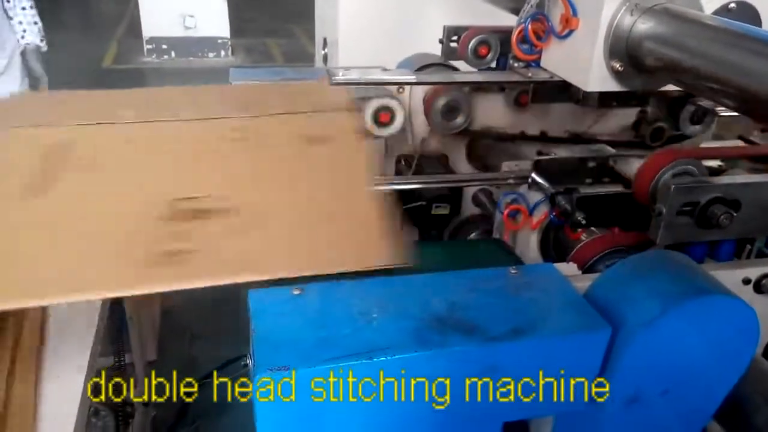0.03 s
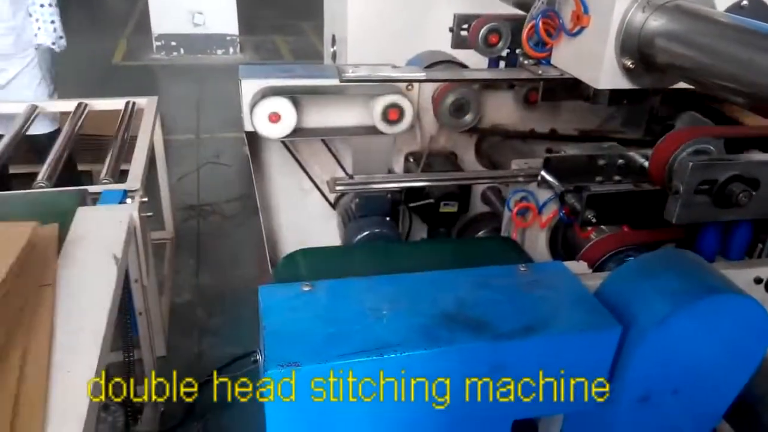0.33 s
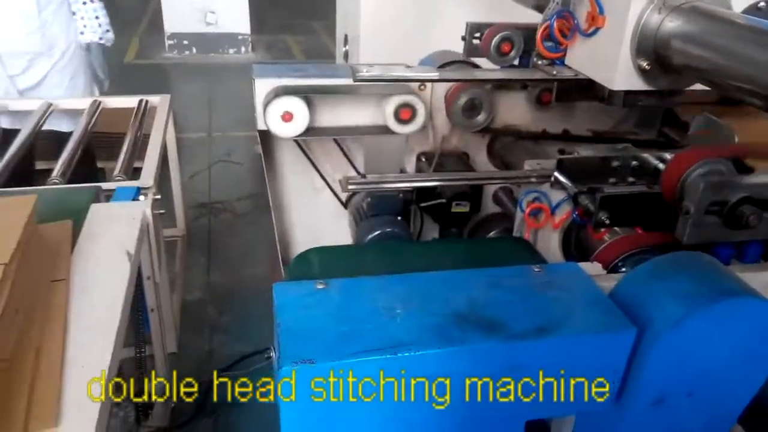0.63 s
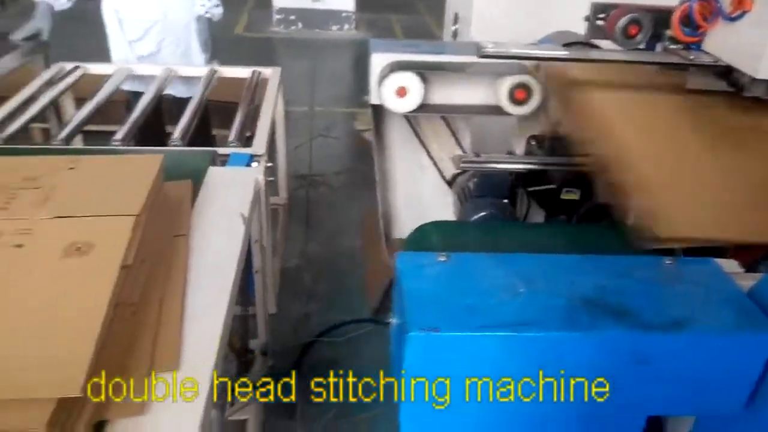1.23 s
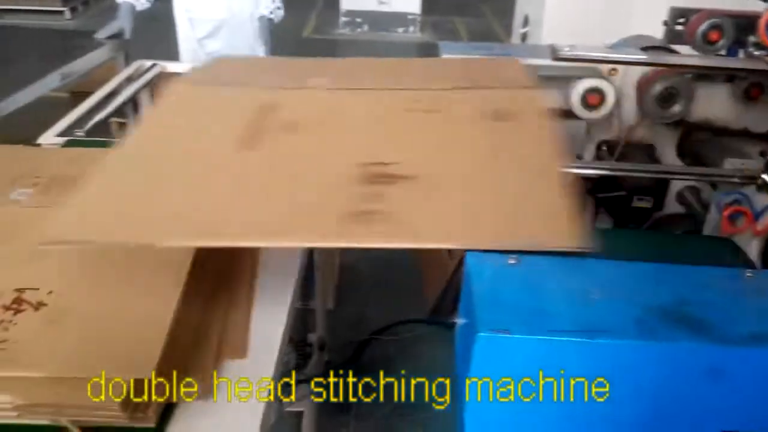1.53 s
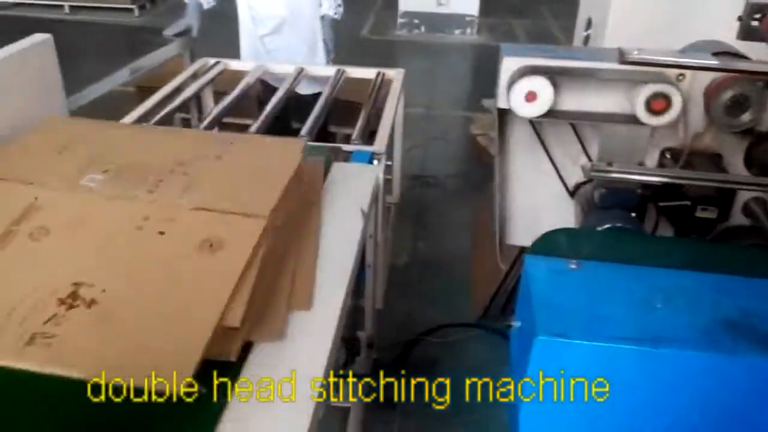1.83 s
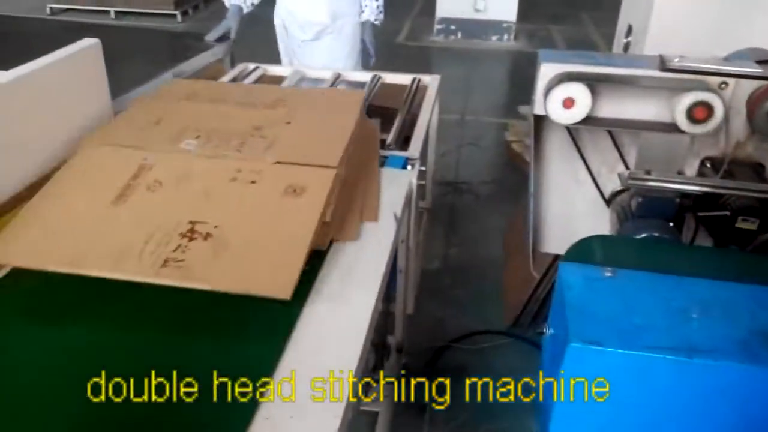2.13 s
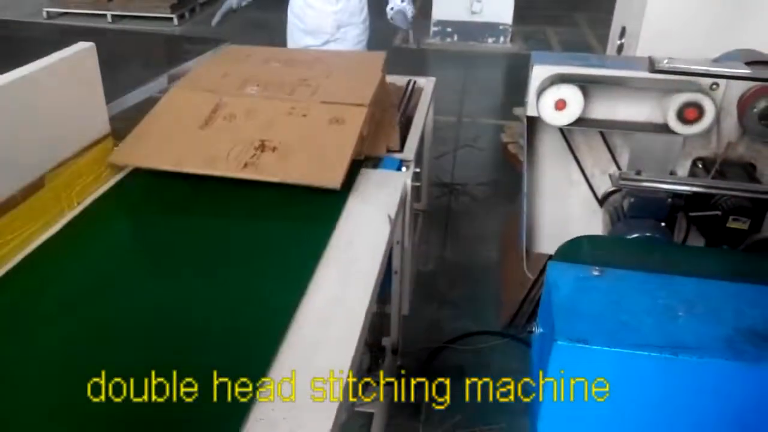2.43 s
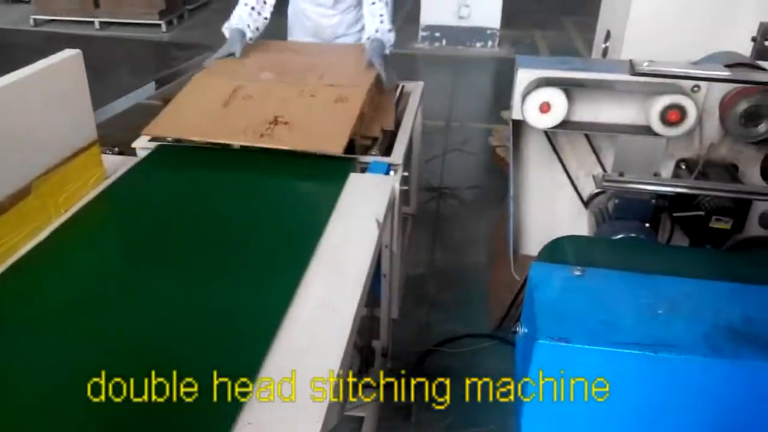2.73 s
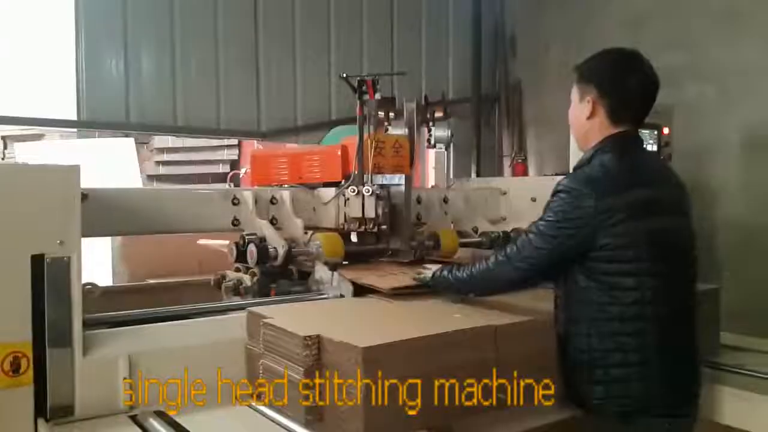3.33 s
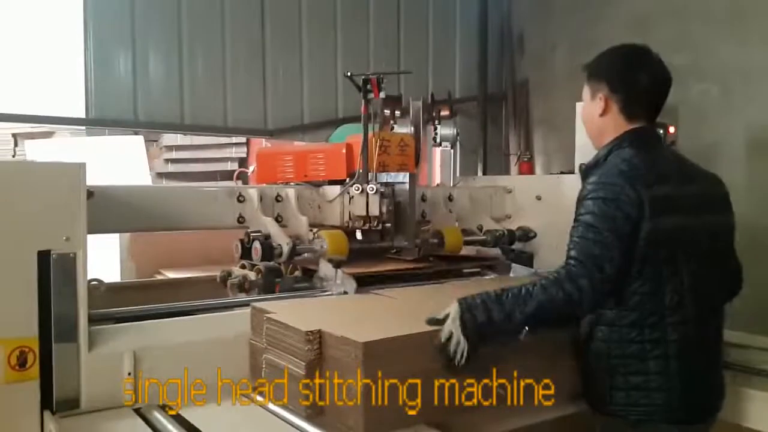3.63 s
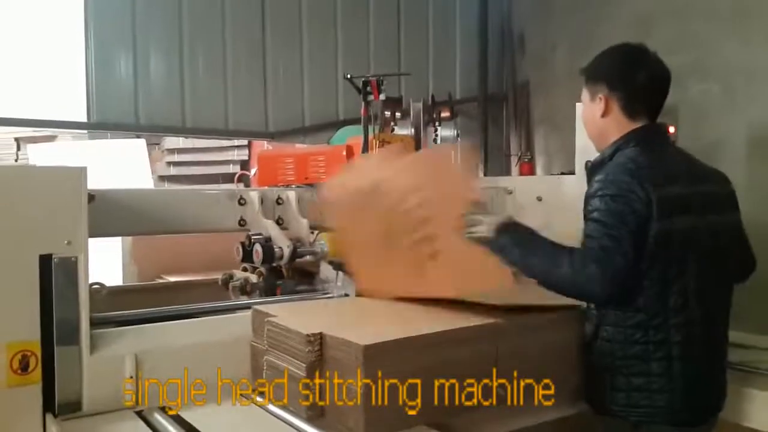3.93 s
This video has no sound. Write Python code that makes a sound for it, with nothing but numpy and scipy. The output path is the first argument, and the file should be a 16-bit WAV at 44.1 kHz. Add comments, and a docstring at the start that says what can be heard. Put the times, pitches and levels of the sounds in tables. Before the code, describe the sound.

A carton stitching machine hammers staples in two rapid bursts, close by in a workshop, amid sharp air hisses, chain rattle and roller rumble. Cardboard slides and bumps. After a brief silence, a second, more distant machine clatters.

```python
"""Two carton stitchers in a workshop.

A double-head stitcher hammers in wire staples by impact, while valves spit jets of air, the drive
rattles and rumbling rollers throw the carton out. After a short silence a single-head stitcher hums,
then starts to clatter. Struck panels and steel parts ring; a limiter ducks the loudest moments."""
import sys
import numpy as np
from scipy import signal
from scipy.fft import rfft, irfft
from scipy.io import wavfile
from scipy.ndimage import uniform_filter1d

SR = 44100
rng = np.random.default_rng(int(sys.argv[2]) if len(sys.argv) > 2 else 0)


def file_out(sig):
    """Save sig as 16-bit WAV at sys.argv[1]."""
    # one column per channel
    cols = np.atleast_2d(sig).T
    # limit, then scale
    lim = np.clip(cols, -1, 1)
    pcm = np.round(lim * 32767).astype(np.int16)
    wavfile.write(sys.argv[1], SR, pcm)


N = 176400
T = np.arange(N) / SR

# blows of the two heads and the carton feed (t/s, level/dB)
HEAD_BLOWS = [(.093, -12.5), (0.16, -29), (0.457, -11.5), (0.566, -14), (0.668, -10), (.714, -7.5),
              (0.759, -7), (0.796, -9), (.859, -14.5), (0.902, -9.5), (0.944, -8), (2.11, -17.5),
              (2.379, -7.5), (2.425, -11), (2.467, -8.5), (2.568, -12), (2.613, -7.5), (2.718, -11.5),
              (2.76, -9.5), (2.818, -12)]
# spectrum of a staple blow (f/Hz, level/dB)
STAPLE_SPECTRUM = [(300, -12), (1200, -9), (3000, 9.5), (6200, 5.5), (8200, -6.5), (15000, -22.5)]
# valve exhausts (t/s, level/dB, hold/s, release T60/s)
EXHAUSTS = [(.004, -13, 0.053, 0.18), (0.153, -13.5, 0.017, .4), (0.303, -14, 0.011, .07),
            (0.373, -6, 0.0053, .04), (0.383, -9, 0.085, 1.1), (1.383, -16.5, 0.18, 0.15),
            (2.099, -21.5, 0.09, .3), (2.18, -6.5, 0.0052, 0.053), (2.198, -7.5, 0.061, 1.1)]
# steady escape of air (t/s, level/dB)
LEAK_LEVEL = [(.35, -19.5), (.7, -16.5), (1.54, -15), (1.62, -20), (1.68, -17.5), (2.05, -25.5), (2.5, -15)]
# spectrum of the air jets (f/Hz, level/dB)
AIR_SPECTRUM = [(500, -40), (1800, -24.5), (3000, -6.5), (4600, -7), (5600, 1.5), (6450, 0.5), (7200, -6.5),
                (8100, -16.5), (10000, -21.5), (15000, -27)]
# clacks of the single-head stitcher (t/s, frame level/dB, wire level/dB)
SINGLE_HEAD_CLACKS = [(3.539, -27.5, -32), (3.569, -25, -22.5), (3.585, -19, -21), (3.609, -13, -17.5),
                      (3.622, -17, -32), (3.645, -21, -15.5), (3.667, -18, -20.5), (3.696, -15, -24),
                      (3.732, -23, -10.5), (3.742, -17, -18), (3.764, -12, -24), (3.778, -11.5, -21.5),
                      (3.851, -13.5, -20.5), (3.914, -13, -25), (3.929, -11.5, -22)]
# spectrum of its frame (f/Hz, level/dB)
FRAME_SPECTRUM = [(130, -21), (290, -3.5), (1150, -4), (1850, 5), (2350, -0.5), (2900, -6.5), (8000, -11.5),
                  (15000, -64)]
# spectrum of its wire guides (f/Hz, level/dB)
WIRE_SPECTRUM = [(1000, -23), (3900, -0.5), (5100, 4.5), (5900, 0), (8000, -3), (11500, -11), (15000, -37)]
# partials of its motor (f/Hz, rms level/dB)
MOTOR_PARTIALS = [(215, -46), (393, -50), (592, -46.5)]
# running noise of its feed rollers (t/s, level/dB)
FEED_LEVEL = [(3.53, -38.5), (3.555, -27.5), (3.8, -21.5)]
# spectrum of its feed rollers (f/Hz, level/dB)
FEED_SPECTRUM = [(20, -28), (130, -3), (310, -1.5), (520, -12.5), (780, -6), (1100, -17), (3000, -22),
                 (15000, -57)]
# rumble of the conveyor's rollers and belts (t/s, level/dB)
ROLLER_LEVEL = [(0, -19), (.08, -22), (.12, -16), (.24, -18), (.44, -25), (.51, -15.5), (1.02, -14.5),
                (1.52, -19.5), (1.66, -16.5), (1.78, -20.5), (2.03, -24.5), (2.3, -20), (2.56, -15.5),
                (2.78, -18), (2.9, -14), (3.17, -18.5)]
# spectrum of that rumble (f/Hz, level/dB)
ROLLER_SPECTRUM = [(20, -21), (45, -34), (85, -11), (170, -1.5), (370, -2), (560, -5), (800, -6),
                   (1150, -10), (2500, -19), (8000, -50)]
# rattle of the drive chains (t/s, level/dB)
CHAIN_LEVEL = [(0, -14), (.13, -20.5), (.2, -14), (.44, -25.5), (.5, -11.5), (.95, -11.5), (1.2, -21.5),
               (1.57, -16), (1.62, -22), (1.7, -11.5), (1.79, -21), (2.08, -29.5), (2.27, -25), (2.31, -13),
               (2.75, -13), (3.17, -24)]
# spectrum of that rattle (f/Hz, level/dB)
CHAIN_SPECTRUM = [(600, -12), (1400, -5), (2150, 0.5), (2900, -3.5), (4500, -1), (6300, -4.5),
                  (8200, -20.5), (12000, -43)]
# carton sliding out (t/s, duration/s, level/dB)
CARTON_SLIDES = [(1.12, 0.21, -26), (1.382, 0.18, -27), (2.85, 0.34, -25)]
# spectrum of scraping cardboard (f/Hz, level/dB)
SCRAPE_SPECTRUM = [(500, -12.5), (3000, 1.5), (7000, -9), (15000, -11)]
# carton bumping on rollers and stack (t/s, f/Hz, level/dB)
CARTON_THUMPS = [(.96, 242, -18), (1.21, 698, -17), (1.574, 331, -19), (1.632, 175, -18), (1.645, 434, -17),
                 (1.68, 204.8, -17), (2.857, 230, -15.5), (2.98, 202, -19.5), (3.035, 618, -15)]
# struck steel parts (t/s, f/Hz, level/dB)
STEEL_PINGS = [(2.309, 2120, -11.5), (3.569, 5200, -16), (3.607, 2060, -12.5), (3.623, 846, -14.5),
               (3.698, 2126, -16), (3.731, 5100, -11), (3.774, 1800, -12.5), (3.932, 1670, -12)]
# droning guard panels (t/s, duration/s, f/Hz, level/dB)
PANEL_DRONES = [(.14, 0.33, 161, -25), (0.307, 2.7, 362.8, -34)]
# near sound field at two microphones:
# (f/Hz, coherence), (f/Hz, left phase lead/rad), (f/Hz, left minus right level/dB)
NEAR_FIELD = ([(30, 0.6), (220, 0.98), (550, 0.6), (850, 0.86), (1200, 0.17), (2500, 0.04)], [(30, 0),
              (750, 0.5), (1400, 3)], [(100, -1.1), (1000, -3), (3200, -.5), (5400, 4), (6300, 2),
              (7200, -5), (9000, -2)])
# far sound field, in the same three lists
FAR_FIELD = ([(800, 0.95), (2300, 0.47), (3000, 0.12)], [(30, 0.032)], [(3400, -1.7), (5000, 1.5),
             (6500, 1), (8000, -6.5)])

VALVE_RISE_S, SPUTTER_SHARE = 0.0033, 0.47
SILENCER_HZ, SILENCER_WOBBLE, SILENCER_DB = 6300, .065, 1.5  # level at unit jet power
THUMP_SWELL_S, THUMP_WOBBLE = 0.017, 0.1177
RING_CYCLES, RING_WOBBLE = 270, .02  # steel decays by 60 dB in RING_CYCLES periods
CUT_S, RESUME_S, CUT_DB_PER_S = 3.175, 3.381, 2997.5  # the silence between the machines
BAND_LIMIT_HZ = 15500


def double_head():
    """Impact excitation: two heads strike in turn, each driving its own set of metallic resonances."""
    out = np.zeros((2, N))
    for head in range(2):
        times, db = np.transpose(HEAD_BLOWS[head::2])
        envelope = blows(times, db, crack_s=0.0096, tail_db=-1.5, tail_t60=0.15)
        out += envelope * noise(STAPLE_SPECTRUM, NEAR_FIELD, ripple_db=3)
    return out


def air_valves():
    """Turbulent jets: valves open, hold and empty through a silencer that whistles when blown hard."""
    power = level(LEAK_LEVEL) ** 2
    for start, db, hold, t60 in EXHAUSTS:
        opening = np.clip((T - start) / VALVE_RISE_S, 0, 1)
        emptying = amp(db - 60 * np.maximum(T - start - hold, 0) / t60)
        power += (opening * emptying) ** 2
    sputter = knocks(per_s=220, spread_db=3, ring_s=.005, share=SPUTTER_SHARE)
    whistle = np.array([tone(SILENCER_HZ, SILENCER_WOBBLE, size=20) for _ in range(2)])
    hiss = noise(AIR_SPECTRUM, NEAR_FIELD) * np.sqrt(power)
    return (hiss + amp(SILENCER_DB) * whistle * power) * sputter


def single_head():
    """Free and forced vibration: clacks ring the frame and wire guides over motor hum and feed noise."""
    times, frame_db, wire_db = np.transpose(SINGLE_HEAD_CLACKS)
    frame = noise(FRAME_SPECTRUM, FAR_FIELD, ripple_db=2)
    frame *= blows(times, frame_db, crack_s=0.0016, tail_db=-3.5, tail_t60=0.34)
    wire = noise(WIRE_SPECTRUM, FAR_FIELD)
    wire *= blows(times, wire_db, crack_s=0.0024, tail_db=-2.5, tail_t60=0.41)
    hum = sum(amp(db) * np.sqrt(2) * np.sin(2 * np.pi * (hz * T + rng.random()))
              for hz, db in MOTOR_PARTIALS)
    feed = noise(FEED_SPECTRUM, FAR_FIELD) * level(FEED_LEVEL)
    hiss = amp(-38.5) * noise(WIRE_SPECTRUM, FAR_FIELD)
    return frame + wire + hum + feed + hiss


def conveyor():
    """Contact noise: rolling makes a rumble, chain impacts a rattle, the carton's friction a scrape."""
    rollers = noise(ROLLER_SPECTRUM, NEAR_FIELD) * level(ROLLER_LEVEL)
    rollers *= knocks(per_s=110, spread_db=1, ring_s=0.021, share=0.59)
    chains = noise(CHAIN_SPECTRUM, NEAR_FIELD) * level(CHAIN_LEVEL)
    chains *= knocks(per_s=330, spread_db=4, ring_s=0.013, share=0.56)
    slide = sum(amp(db) * arch(start, length) for start, length, db in CARTON_SLIDES)
    grain = knocks(per_s=600, spread_db=2, ring_s=.001, share=.5)
    return rollers + chains + slide * grain * noise(SCRAPE_SPECTRUM, NEAR_FIELD)


def carton_thumps():
    """Damped plate modes: each bumped panel of board swells and dies on its own unsteady note."""
    out = np.zeros(N)
    for start, hz, db in CARTON_THUMPS:
        age = np.maximum(T - start, 0) / THUMP_SWELL_S
        out += amp(db) * age * np.exp(1 - age) * tone(hz, THUMP_WOBBLE, size=200)
    return out


def steel_pings():
    """Constant-Q decay: each part rings on one note, blurred by the room differently in each channel."""
    out = np.zeros((2, N))
    for start, hz, db in STEEL_PINGS:
        ring = (T >= start) * amp(db - 60 * np.maximum(T - start, 0) * hz / RING_CYCLES)
        out += ring * np.array([tone(hz, RING_WOBBLE, size=100) for _ in range(2)])
    return out


def guard_panels():
    """Plate resonance: sheet-metal guards drone with a wavering pitch."""
    return sum(amp(db) * arch(start, length) * tone(hz, wobble=0.0257, size=1500)
               for start, length, hz, db in PANEL_DRONES)


def blows(times, levels_db, crack_s, tail_db, tail_t60):
    """Energy superposition: the envelope of short cracks, each with the workshop's reverberant tail."""
    energy = np.zeros(N)
    energy[np.round(np.asarray(times) * SR).astype(int)] = amp(levels_db) ** 2
    t = T[:SR]
    decay = np.exp(-t / crack_s) + amp(tail_db - 60 * t / tail_t60) ** 2
    return np.sqrt(abs(signal.fftconvolve(energy, decay)[:N]))


def knocks(per_s, spread_db, ring_s, share):
    """Poisson process: the envelope of small random pulses, each dying away, over an even bed."""
    hits = rng.random(N) < per_s / SR
    energy = hits * amp(spread_db * np.minimum(rng.exponential(1, N), 3)) ** 2
    power = signal.lfilter([1], [1, -np.exp(-1 / (ring_s * SR))], energy)
    return np.sqrt(1 - share + share * power / power.mean())


def noise(spectrum, field, ripple_db=1.3):
    """Partial coherence: stereo noise of unit rms, rippled by the many resonances of the steelwork."""
    hz = np.fft.rfftfreq(N, 1 / SR)
    coherence, lead, balance_db = (at_frequency(curve, hz) for curve in field)
    left, independent = rfft(rng.standard_normal((2, N)))
    right = (coherence * left + np.sqrt(1 - coherence ** 2) * independent) * np.exp(-1j * lead)
    pair = np.array([left * amp(balance_db / 2), right * amp(-balance_db / 2)])
    ripple = uniform_filter1d(rng.standard_normal(len(hz)), size=240)
    ripple = unit(uniform_filter1d(ripple, size=160))
    colour = amp(at_frequency(spectrum, hz) + ripple_db * ripple)
    return unit(irfft(pair * colour, N))


def tone(hz, wobble, size):
    """Random frequency modulation: pitch wanders by the share wobble, smoothed over size samples."""
    waver = unit(uniform_filter1d(rng.standard_normal(N), size=size))
    return np.sin(2 * np.pi * np.cumsum(hz * (1 + wobble * waver)) / SR)


def arch(start, length):
    """A swell whose power follows a half sine."""
    return np.sqrt(abs(np.sin(np.pi * np.clip((T - start) / length, 0, 1))))


def level(points):
    """Gain over time, interpolated in decibels."""
    return amp(np.interp(T, *np.transpose(points)))


def at_frequency(points, hz):
    """Interpolation along a logarithmic frequency axis."""
    f, value = np.transpose(points)
    return np.interp(np.log(hz + 1), np.log(f + 1), value)


def amp(db):
    """Amplitude ratio from decibels."""
    return 10 ** (np.asarray(db) / 20)


def unit(x):
    """Normalisation to unit rms."""
    return x / np.sqrt(np.mean(x ** 2) + 1e-20)


def scene():
    """Superposition of sources: one machine, a short silence, then the other."""
    fade_out = amp(-np.maximum(T - CUT_S, 0) * CUT_DB_PER_S)
    fade_in = np.clip((T - RESUME_S) / .006, 0, 1)
    first_machine = conveyor() + carton_thumps() + guard_panels() + air_valves() + double_head()
    return fade_out * first_machine + fade_in * single_head() + steel_pings()


def limit(x, threshold_db, recover_db_per_s, share):
    """Compression: gain drops by a share of the held level's excess; the held level sinks steadily."""
    power_db = 10 * np.log10(abs(uniform_filter1d((x ** 2).mean(0), size=300)) + 1e-12)
    fall = T * recover_db_per_s
    held_db = np.maximum.accumulate(power_db + fall) - fall
    over_db = np.maximum(held_db - threshold_db, 0)
    return x * amp(-share * uniform_filter1d(over_db, size=100))


def record(dry):
    """Amplitude and band limiting: a limiter, clipping at full scale, then a low-pass filter."""
    limited = limit(dry, threshold_db=-7.5, recover_db_per_s=71.0, share=0.78)
    lowpass = signal.firwin(511, BAND_LIMIT_HZ, window=("kaiser", 9), fs=SR)
    return signal.oaconvolve(np.clip(limited, -1, 1), lowpass[None], "same")


dry = scene()
out = record(dry)
file_out(out)
```